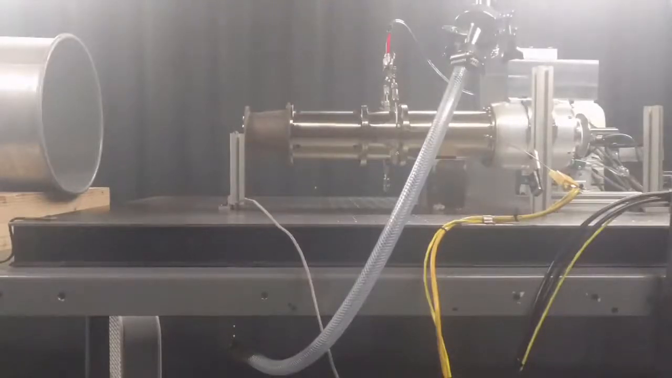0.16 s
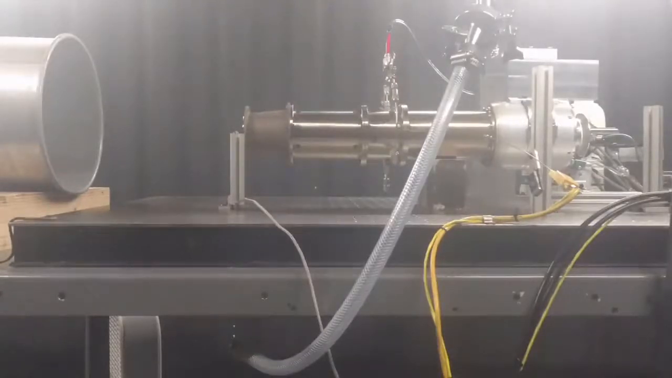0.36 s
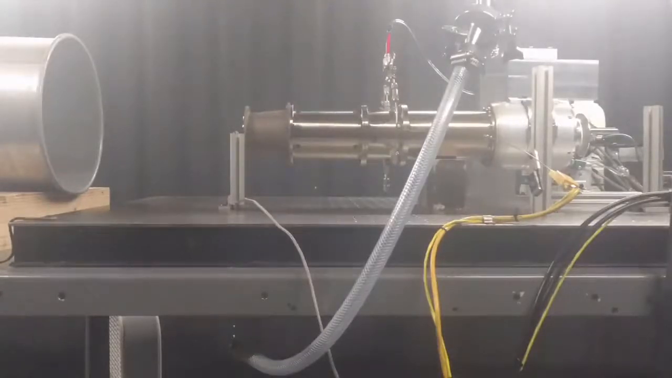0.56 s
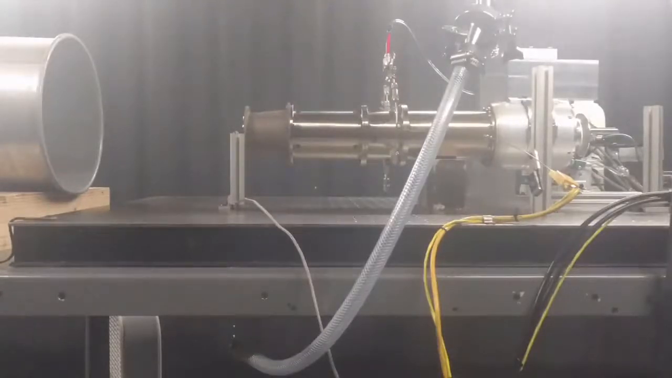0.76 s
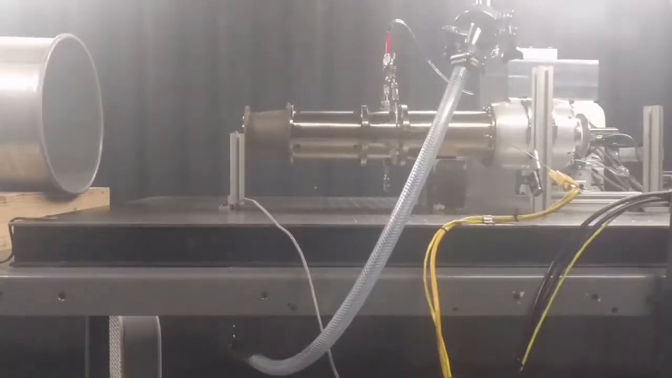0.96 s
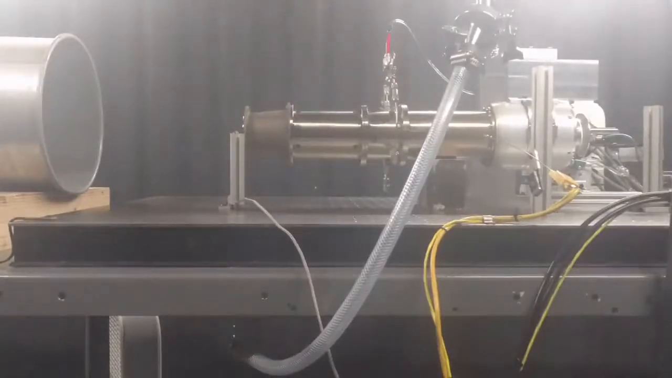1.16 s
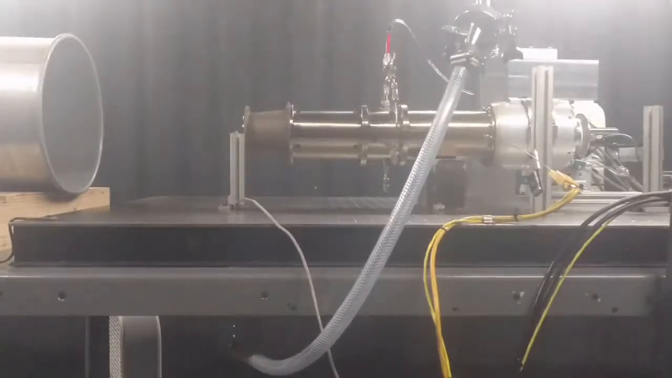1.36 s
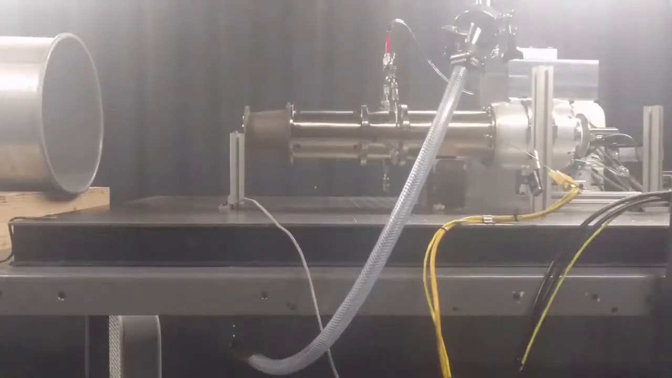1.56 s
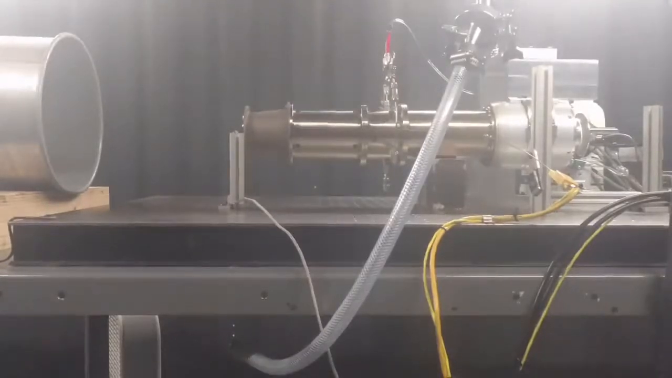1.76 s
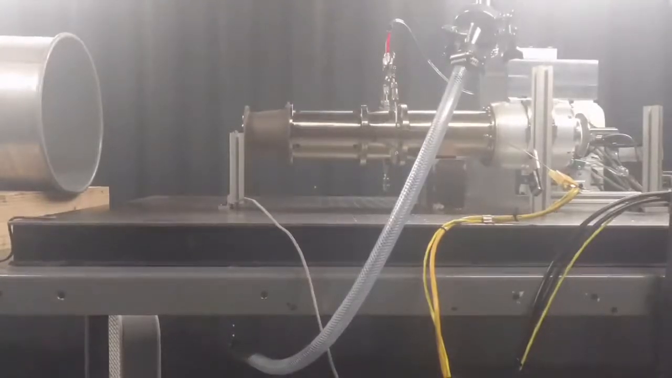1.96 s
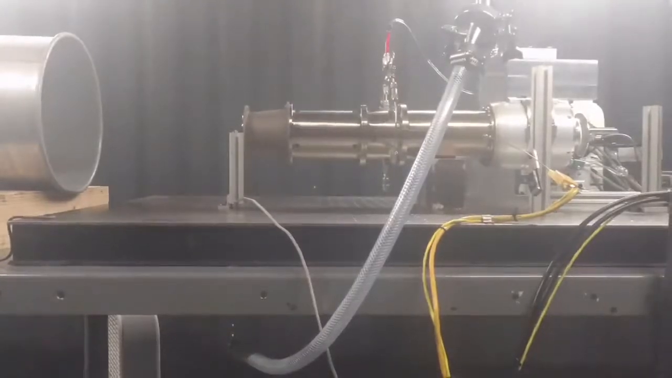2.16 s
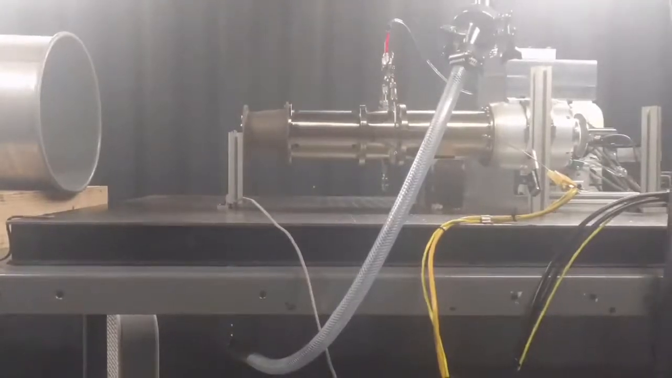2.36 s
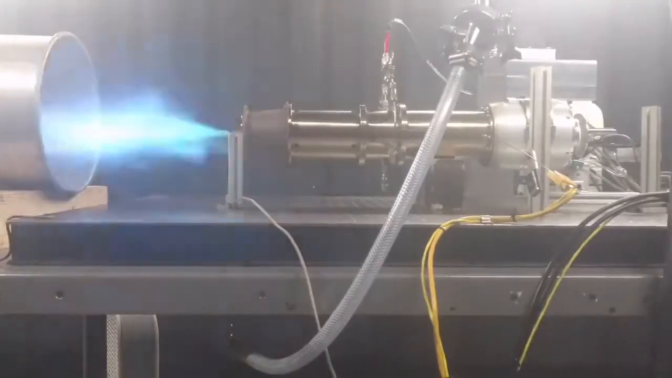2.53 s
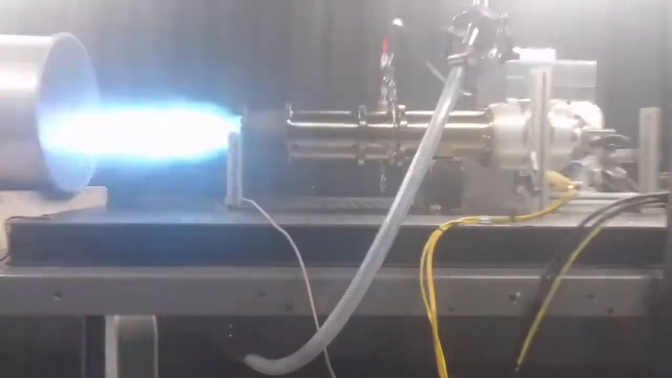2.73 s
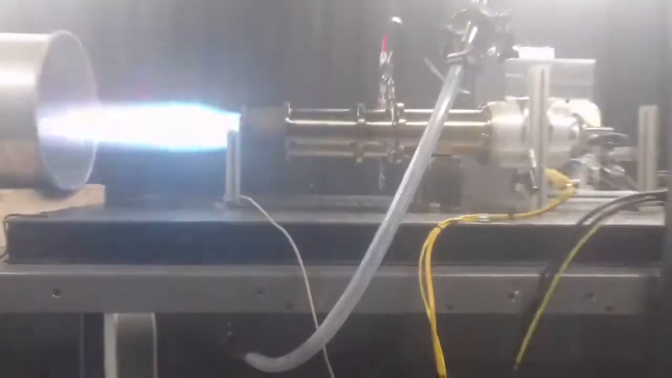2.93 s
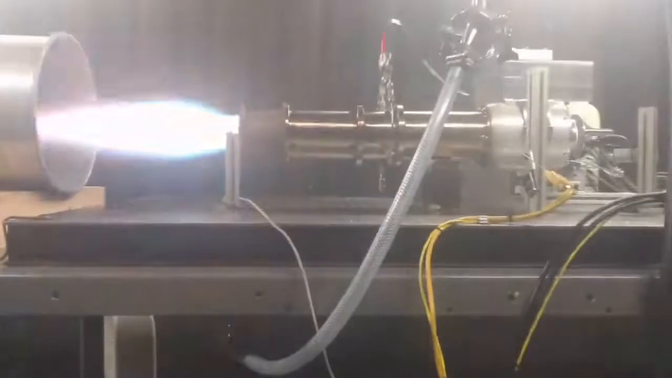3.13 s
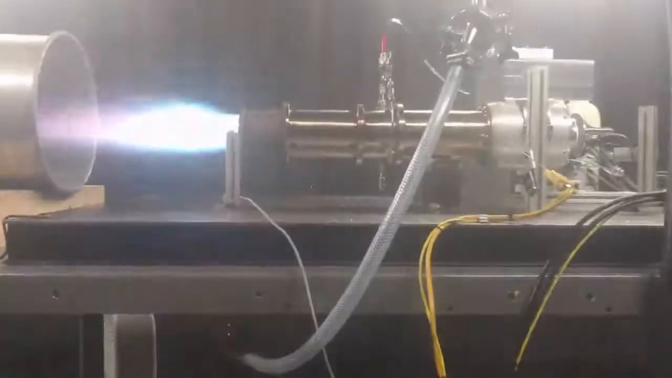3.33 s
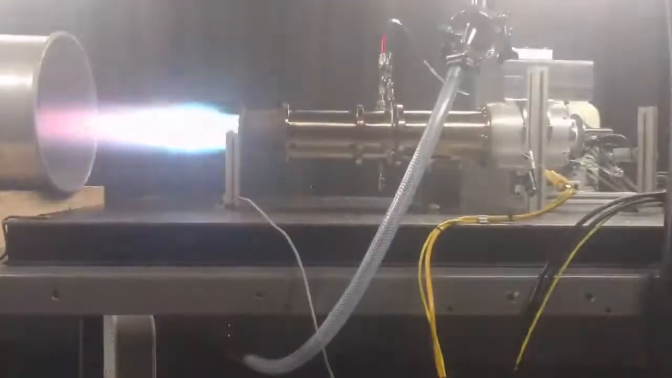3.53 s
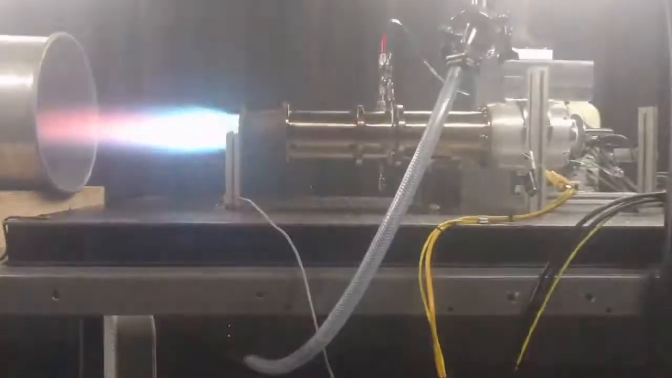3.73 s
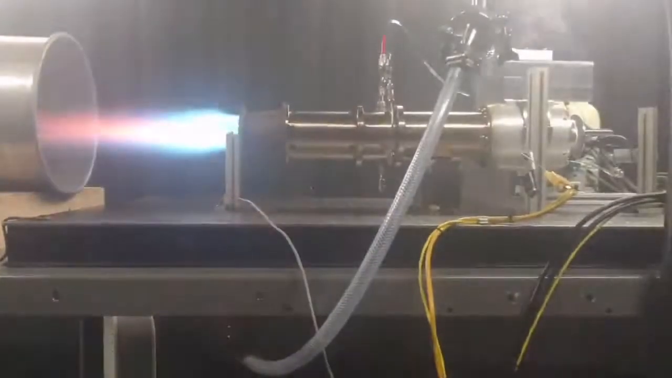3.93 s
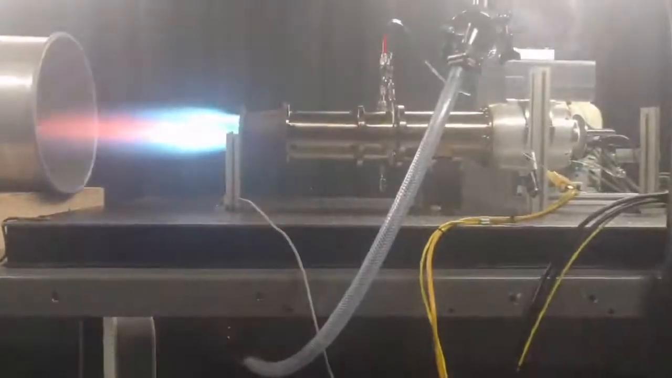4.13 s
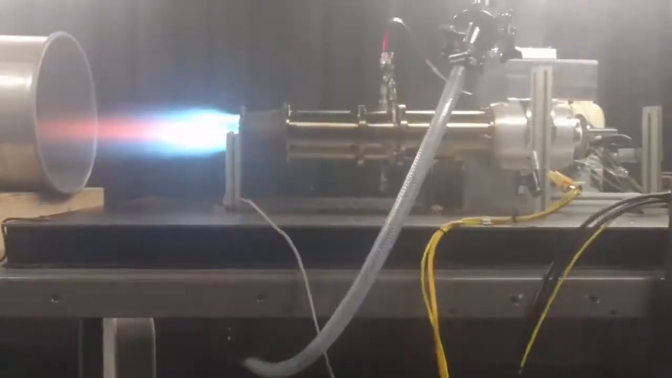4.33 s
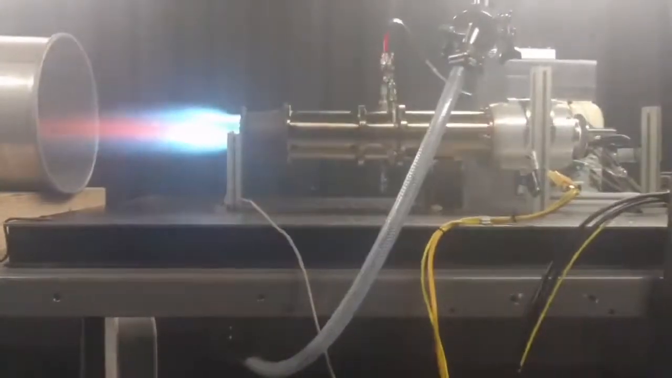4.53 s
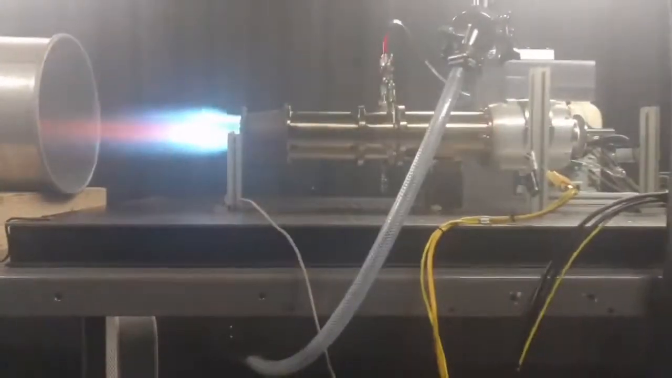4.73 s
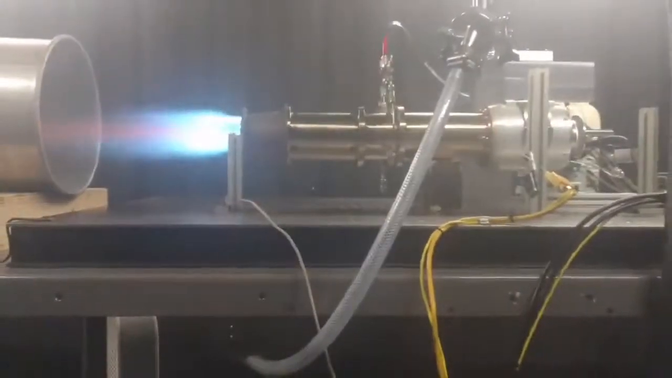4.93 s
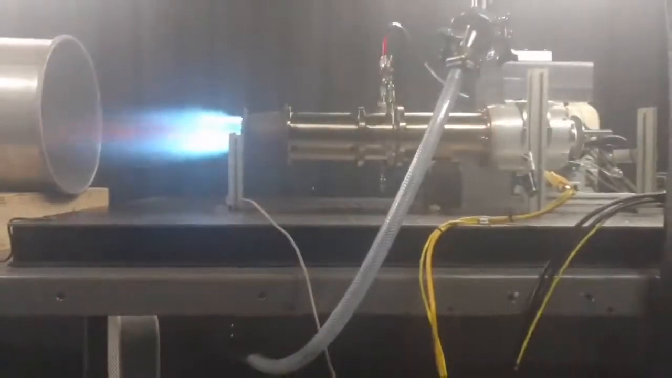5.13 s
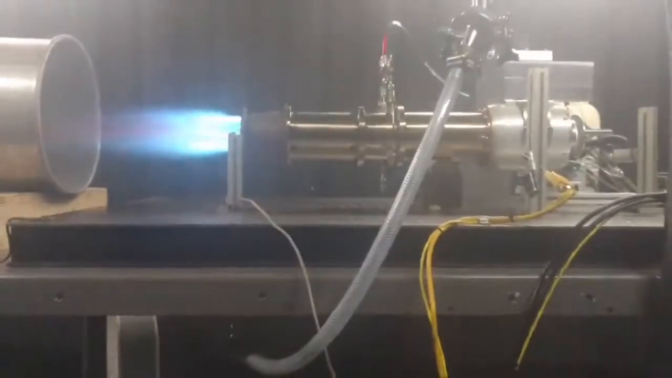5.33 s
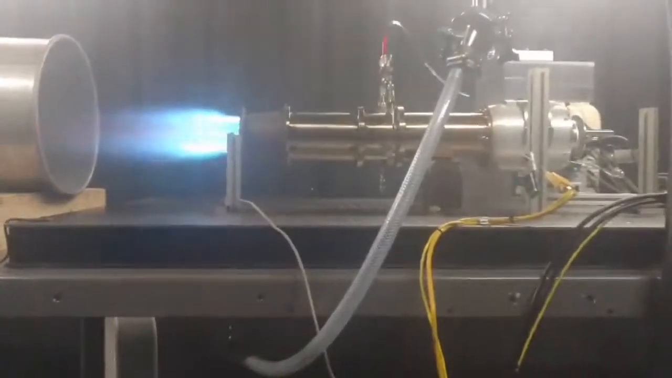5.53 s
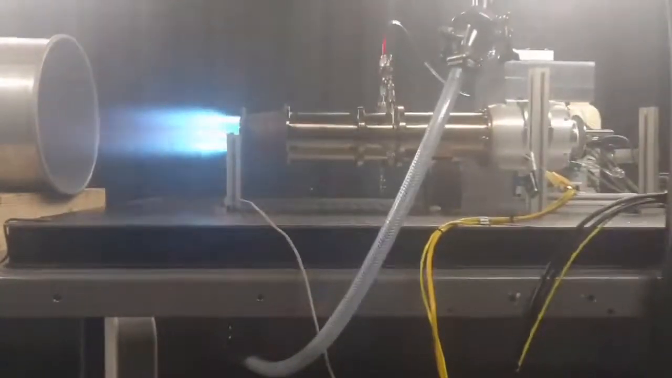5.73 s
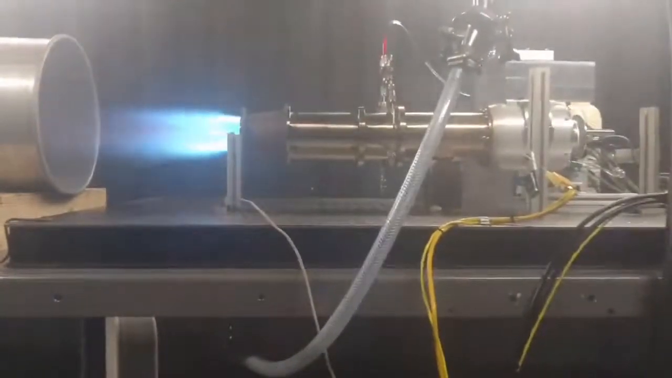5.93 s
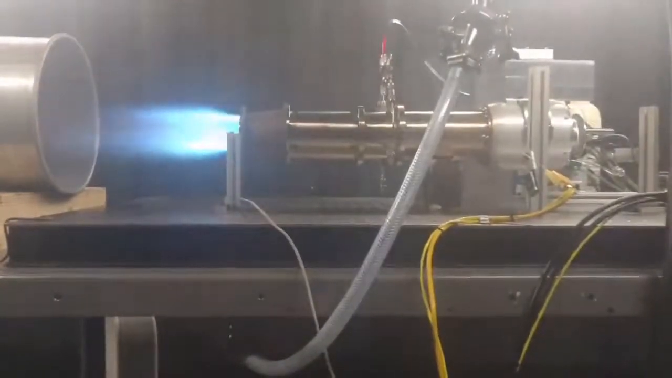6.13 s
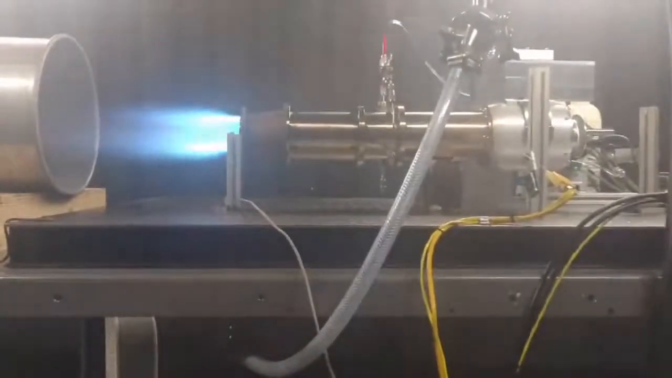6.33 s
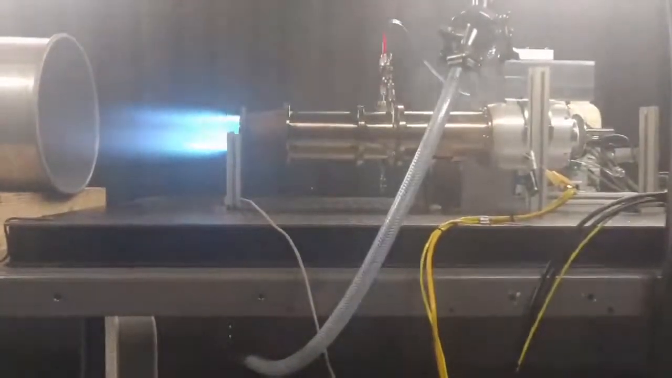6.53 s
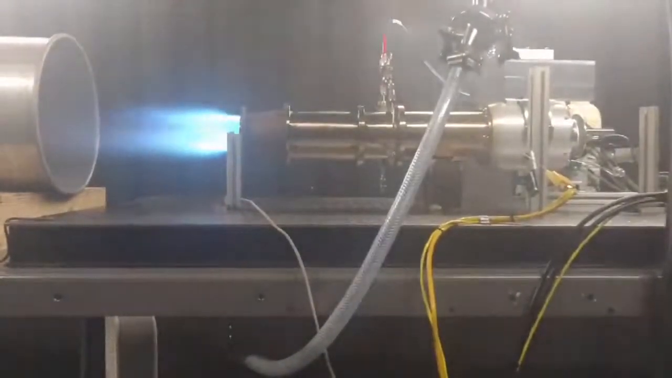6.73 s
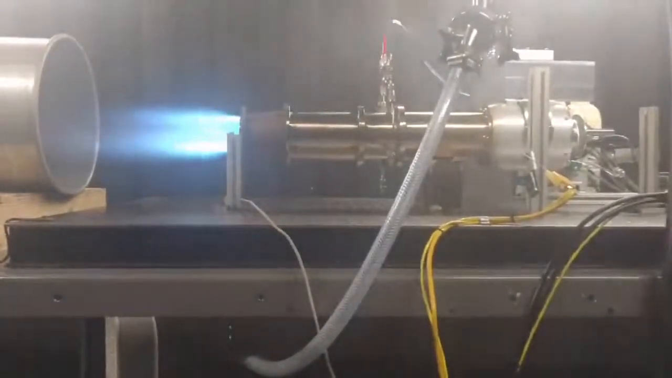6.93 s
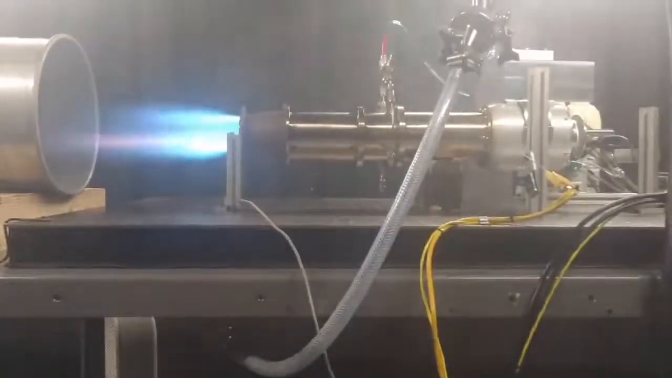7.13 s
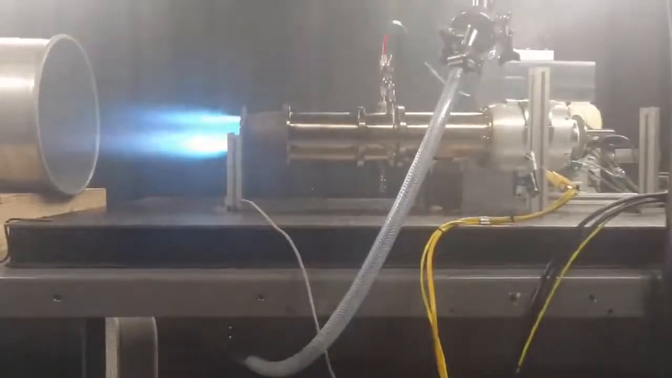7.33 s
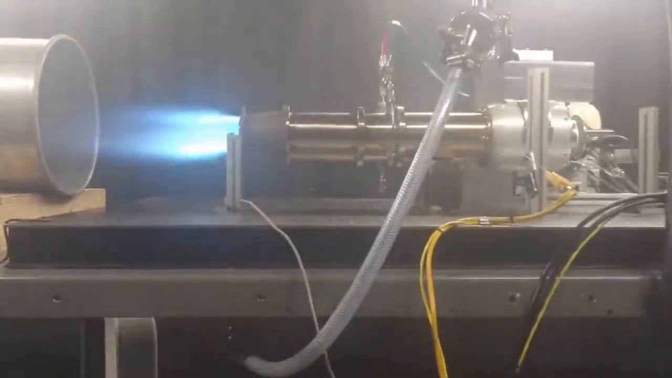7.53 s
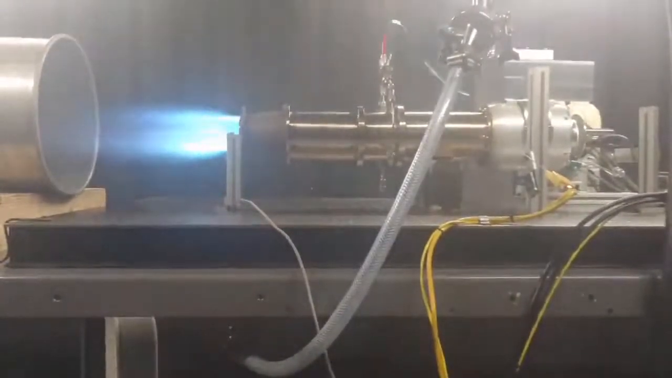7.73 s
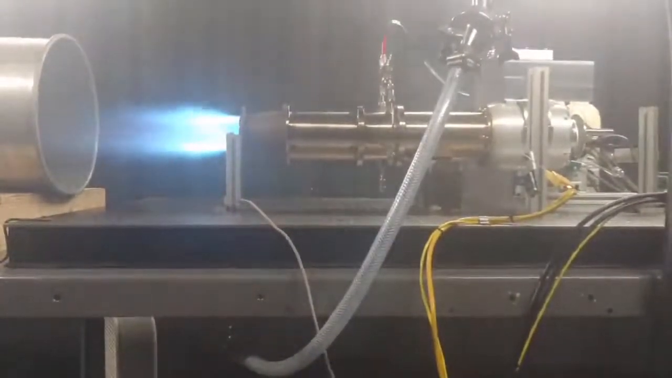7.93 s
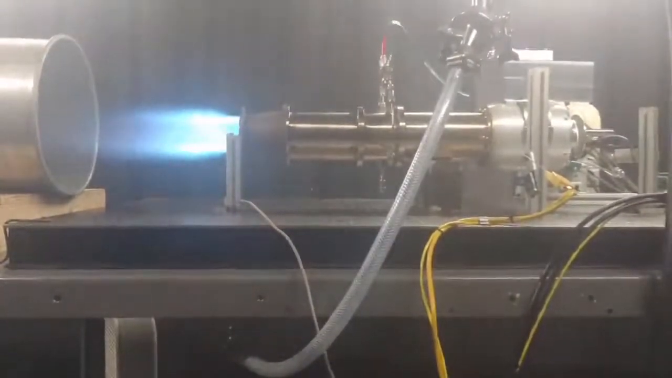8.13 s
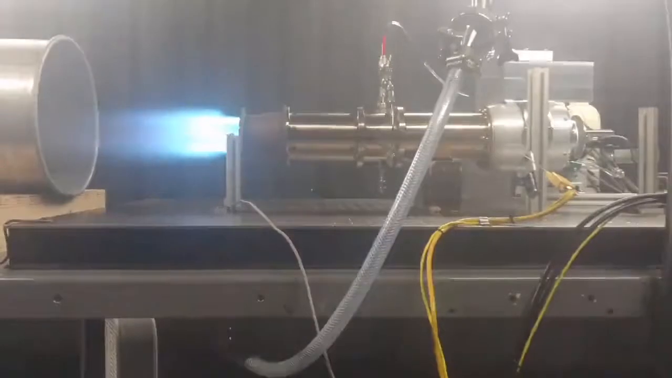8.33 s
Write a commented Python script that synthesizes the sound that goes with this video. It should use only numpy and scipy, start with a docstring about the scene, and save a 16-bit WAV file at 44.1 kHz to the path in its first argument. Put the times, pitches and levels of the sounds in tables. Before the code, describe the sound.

Close to a small turbine in a hard-walled test cell: piercing blade whine, breathy exhaust hiss and a restrained low rumble. After a couple of seconds comes a thick ignition whump, and a hollow tail-pipe roar swells up as the engine spools higher. Thin whistles sit on top, and the roar flutters with small quick dips. The loud part sounds compressed and rough, with no ending.

```python
"""A small jet engine idles on a test rig with a thin blade whine and a whistle over the hiss of its jet.
The shaft starts to spool up, the afterburner lights with a deep boom and rumble, and the blade tones climb.
Then filtered noise roars in the tail pipe, two more whistles sound, and the flame sputters now and then.
Two close microphone ports hear it, one late and inverted; the loudest peaks overload."""
import sys
import numpy as np
from scipy import signal
from scipy.fft import rfft, irfft
from scipy.io import wavfile
from scipy.ndimage import uniform_filter1d

SR = 44100
rng = np.random.default_rng(int(sys.argv[2]) if len(sys.argv) > 2 else 0)


def log_audio(samples):
    """Write samples as a 16-bit WAV file to the path given in sys.argv[1]."""
    # one column per channel
    frames = np.atleast_2d(samples).T
    # limit to full scale, then quantise
    limited = np.clip(frames, -1, 1)
    pcm = np.round(limited * 32767).astype(np.int16)
    wavfile.write(sys.argv[1], SR, pcm)


N = 373968
HZ = np.maximum(np.fft.rfftfreq(N, 1 / SR), 1)   # bin frequencies, floored at 1 Hz for the logarithm

# change from unlit to lit: (time [s], share of the lit sound against the unlit sound [0-1])
LIT_SHARE = [(2.64, 0.027), (2.72, 0.58), (3.2, 0.94)]


def from_db(db):
    """Level to amplitude: 20 dB is a factor of ten."""
    return 10 ** (np.asarray(db) / 20)


def rms_one(x):
    """Normalize the mean power to 1."""
    return x / np.sqrt(np.mean(x ** 2) + 1e-20)


def in_time(rows):
    """Linear interpolation: each column of a time table, one value per sample."""
    s, *columns = np.transpose(rows)
    return [np.interp(np.arange(N) / SR, s, c) for c in columns]


def at_hz(points, beyond=None):
    """Interpolation over log frequency: a table read at every bin."""
    hz, value = np.transpose(points)
    return np.interp(np.log(HZ), np.log(hz), value, beyond, beyond)


def drift(corner_hz):
    """Low-passed random process: white noise through two equal poles, scaled to rms 1."""
    step, run_in = 40, 2000   # drawn at every 40th sample, after the filter has settled
    pole = np.exp(-2 * np.pi * corner_hz * step / SR)
    white = rng.standard_normal(N // step + 2 + run_in)
    slow = signal.lfilter([1], [1, -2 * pole, pole * pole], white)[run_in:]
    return np.interp(np.arange(N) / step, np.arange(len(slow)), rms_one(slow))


def blend(before, after, share):
    """Equal-power crossfade: unrelated noises add in power."""
    share = np.clip(share, 0, 1)
    return np.sqrt(1 - share) * before + np.sqrt(share) * after


def duct():
    """Resonance: each mode lifts (or lowers) the level along a bell over frequency."""
    # modes of tail pipe, exhaust duct and test cell: (frequency [Hz], width [Hz], boost [dB])
    modes = [(147, 6.6, -2), (205, 20, 4), (275, 30, 4), (370, 24, 5), (487, 25, 3.5), (575, 50, 4),
             (851, 90, 4), (1250, 60, 3), (1540, 20, 4), (1945, 30, 3.5)]
    return from_db(sum(db / (1 + (2 * (HZ - hz) / width_hz) ** 2) for hz, width_hz, db in modes))


def turbulence(colour, patchy_db, rate):
    """Broadband flow noise: two unrelated coloured draws under one random envelope; joint rms 1."""
    white = rfft(rng.standard_normal((2, N)))
    coloured = irfft(white * from_db(at_hz(colour, -200)) * duct(), N)
    return rms_one(coloured * from_db(patchy_db * drift(rate)))


def whistle(rows, line_share, width_hz):
    """Flow tone of imperfect coherence: a wavering line in a narrow noise band, inaudible outside its rows."""
    hz, db = in_time([(rows[0][0] - .01, rows[0][1], -120)] + rows)
    db = np.where(np.arange(N) / SR > rows[-1][0], -120, db)
    phase = 2 * np.pi * np.cumsum(hz + 12 * drift(7.92)) / SR
    band = drift(width_hz) * np.cos(phase) + drift(width_hz) * np.sin(phase)
    line = np.sqrt(2) * from_db(5 * drift(12)) * np.sin(phase)
    return from_db(db) * blend(band, line, line_share)


def blade_whine(base_hz):
    """Harmonic series on the blade rate: eddies make the lines flutter and spread noise as the shaft speeds up."""
    # blade tones: (time [s], 2nd harmonic [dB], 3rd harmonic [dB]), before flutter
    middle_harmonics = [(0.0, -26.5, -40), (0.2, -24, -32), (0.27, -34, -34), (0.4, -22.5, -29),
                        (0.6, -26.5, -39), (0.8, -31, -20.5), (1.03, -29.5, -28), (1.2, -26, -43),
                        (1.4, -22, -28), (1.76, -18, -29), (1.85, -30, -36), (2.13, -29, -29),
                        (2.2, -30, -31), (2.3, -29, -26), (2.52, -21.5, -28), (2.75, -39, -27),
                        (3.1, -30, -26), (3.45, -22, -29), (3.65, -26, -47), (3.85, -30, -48),
                        (4.2, -30.5, -46), (4.45, -34, -39), (4.8, -39, -36), (5.1, -34, -35),
                        (5.4, -38, -40), (5.65, -31, -31), (6.4, -34, -32), (6.55, -35, -46),
                        (7.15, -36, -46), (7.4, -36, -36), (8.48, -36, -35)]
    first_db, fourth_db = -44, -49
    wander_db, wander_hz = 1.2, 3.5
    phase = 2 * np.pi * np.cumsum(base_hz * (1 + .0008 * drift(25))) / SR
    speeding = np.clip(np.gradient(base_hz) * SR / 900, .05, 1)   # 1 at a rise of 900 Hz/s
    levels_db = [first_db] + in_time(middle_harmonics) + [fourth_db]
    out = 0
    for k, db in enumerate(levels_db, 1):
        flutter = from_db(np.minimum(5 * drift(14), 3))
        line = np.sqrt(2) * (1 - .6 * speeding) * flutter * np.sin(k * phase)
        skirt = drift(95) * np.sin(k * phase) + drift(140) * np.cos(k * phase)
        skirt = from_db(1.5) * np.maximum(speeding, .2) * skirt
        out = out + from_db(db + wander_db * drift(wander_hz)) * (line + skirt)
    return out


def jet_hiss(level_db, base_hz):
    """Jet mixing noise: its colour follows the shaft rate, and its treble flickers."""
    # colour at low shaft rate: (frequency [Hz], relative density [dB per Hz])
    idle_colour = [(2600, -30), (3000, -9), (3400, -4), (4200, -8), (5200, -9), (5900, -1), (6400, -5),
                   (7300, -6), (8500, 0), (9100, -1), (9800, -9), (10600, -14), (12000, -21), (12600, -27),
                   (13700, -29), (14400, -35), (15400, -38)]
    # colour at high shaft rate: (frequency [Hz], relative density [dB per Hz])
    full_colour = [(2500, -24), (2850, -1), (3500, 0), (4200, -2), (6100, 0), (6900, -3), (8000, -4),
                   (8400, -2), (9050, -5), (9450, -1), (10500, -6), (12100, -10), (14000, -11),
                   (14600, -24)]
    spooled = (base_hz - 3226) / 1020   # blend holds it within 0-1
    idle = turbulence(idle_colour, patchy_db=.6, rate=14)
    full = turbulence(full_colour, patchy_db=.6, rate=14)
    hiss = blend(idle, full, spooled)
    treble = irfft(rfft(hiss) * (HZ > 10500), N)
    hiss = hiss + (from_db(1.8 * drift(12)) - 1) * treble
    return from_db(level_db) * hiss


def tail_pipe_roar(level_db, lit):
    """Pipe resonance in broadband noise: the roar changes colour with the flame and a surging howl joins it."""
    # colour before the flame: (frequency [Hz], relative density [dB per Hz])
    idle_colour = [(350, -25), (480, -3), (700, -1), (1000, -3), (1300, -7), (1600, -4), (1850, -3),
                   (2100, 2), (2500, 0), (2800, -3.5), (3100, -30)]
    # colour with the flame: (frequency [Hz], relative density [dB per Hz])
    full_colour = [(350, -20), (480, -2), (650, -3), (850, -2), (1050, -6), (1350, -10), (1800, -9),
                   (2300, -6), (2550, -10), (2800, -16), (3200, -35)]
    # main resonance of the tail pipe: (frequency [Hz], relative density [dB per Hz])
    howl_colour = [(600, -30), (730, -6), (870, 0), (970, -5), (1120, -30)]
    idle = turbulence(idle_colour, patchy_db=.4, rate=9)
    full = turbulence(full_colour, patchy_db=.9, rate=9)
    howl = lit * from_db(-11) * turbulence(howl_colour, patchy_db=3, rate=12.0)
    return from_db(level_db) * (blend(idle, full, lit) + howl)


def rumble_and_wind(level_db, lit):
    """Low broadband noise: the rumble changes colour with the flame; sub-bass buffets of wind on the ports join it."""
    # colour before the flame: (frequency [Hz], relative density [dB per Hz])
    idle_colour = [(15, -42), (45, -35), (80, -7), (100, -15), (130, -5), (200, 0), (280, 1.5), (350, -5),
                   (450, -13.5), (600, -41)]
    # colour with the flame: (frequency [Hz], relative density [dB per Hz])
    lit_colour = [(45, -28), (80, -14), (130, -5), (170, -2), (230, 0), (350, -2), (450, -7), (600, -30)]
    # colour of the wind buffets: (frequency [Hz], relative density [dB per Hz])
    buffet_colour = [(15, -18), (30, -23), (45, -20), (62, 3), (85, 10), (120, -19)]
    surge_db, surge_hz = .9, 4
    idle = turbulence(idle_colour, patchy_db=2.5, rate=17.0)
    burning = turbulence(lit_colour, patchy_db=-1.2, rate=15)
    buffets = from_db(-27.0 + 2.1 * lit) * turbulence(buffet_colour, patchy_db=3.5, rate=7.7)
    return from_db(level_db + surge_db * drift(surge_hz)) * (blend(idle, burning, lit) + buffets)


def ignition_boom():
    """Sudden heat release: unburnt fuel goes up in low noise with an attack, slow swell and steady fall."""
    # colour: (frequency [Hz], relative density [dB per Hz])
    boom_colour = [(50, -30), (90, -15), (135, 4), (200, 0), (260, -12), (400, -15), (650, -16),
                   (1000, -40)]
    start_s, attack_s, hold_s = 2.657, .012, .34
    peak_db, swell_db, fall_db_per_s = -13, 1, 120
    held_s = start_s + attack_s
    fall_s = held_s + hold_s
    level_db = in_time([(0, -120), (start_s, -120), (held_s, peak_db - swell_db), (fall_s, peak_db),
                        (fall_s + 1, peak_db - fall_db_per_s)])[0]
    return from_db(level_db) * turbulence(boom_colour, patchy_db=2.0, rate=10.0)


def sputter_db():
    """Flame instability: each sputter is a smooth squared-cosine dip of the level and back."""
    # momentary sinking of the flame: (time at the deepest [s], length [s], dip of the roar [dB])
    sputters = [(4.873, 0.028, -5.5), (4.96, 0.065, -3), (5.383, 0.069, -6), (5.569, 0.12, -5),
                (5.62, .05, -5.5), (5.79, 0.12, -5), (6.07, 0.2, -2.5), (6.337, 0.098, -3),
                (6.442, 0.36, -4), (6.675, 0.046, -3), (6.79, 0.18, -2), (6.934, 0.16, -2.5),
                (7.237, 0.1, -1.5), (7.549, 0.068, -0.5), (7.62, 0.042, -3), (8.018, 0.084, -3),
                (8.176, 0.084, -2.5)]
    t = np.arange(N) / SR
    return sum(db * np.cos(np.pi * np.clip((t - s) / length, -.5, .5)) ** 2 for s, length, db in sputters)


def flame_and_jet(base_hz):
    """Superposition of hiss, roar, rumble with wind, and boom; the sputters dip all but the boom."""
    # levels before the sputters: (time [s], flame rumble [dB], tail pipe roar [dB], jet hiss [dB])
    burn = [(0.0, -27, -25.5, -20), (0.8, -22.5, -25, -20), (1.5, -25.5, -24.5, -20),
            (2.0, -23.5, -25, -19.5), (2.4, -19, -23, -18.5), (2.645, -20.5, -21.5, -18),
            (2.675, -11, -20, -18.5), (2.78, -9, -17.5, -18.5), (2.9, -7, -15.5, -19),
            (3.05, -8.5, -13.5, -18.5), (3.3, -11, -12, -17), (4.05, -8, -11, -16), (4.35, -12, -11.5, -17),
            (5.2, -11, -12.5, -17), (6.25, -11, -12.5, -17), (6.6, -12, -12.5, -18), (7.2, -10, -13, -17),
            (7.8, -12, -13.5, -17.5), (8.48, -11, -13, -17)]
    dip_per_roar_dip = [1.6, 1, .45]   # rumble, roar, hiss [dB per dB]
    rumble_db, roar_db, hiss_db = in_time(burn) + np.outer(dip_per_roar_dip, sputter_db())
    lit = in_time(LIT_SHARE)[0]
    background = jet_hiss(hiss_db, base_hz) + tail_pipe_roar(roar_db, lit)
    return background + rumble_and_wind(rumble_db, lit) + ignition_boom()


def ports(flow, tones, tones_right_db):
    """Partial coherence: the right port hears the left's sound late and inverted, mixed with its own."""
    # phase shift by the housing: (frequency [Hz], lead of the right port [rad])
    right_lead = [(100, 0), (600, -.25), (1250, -.08), (2000, -.2), (2500, -.15), (2700, -.65),
                  (3100, -.45), (3800, 0), (8000, .2), (10000, .7), (12500, .9), (15300, .5)]
    # likeness of the ports where they are in or out of phase: (frequency [Hz], likeness [0-1])
    in_or_out_of_phase = [(30, .995), (55, .99), (90, .95), (140, .8), (250, .72), (450, .65), (900, .999),
                          (4000, .997), (5100, .6), (6400, .78), (7700, .38), (9500, .4), (10400, .6),
                          (12000, .85), (14200, .95)]
    # likeness midway between those phases: (frequency [Hz], likeness [0-1])
    between_phases = [(200, .6), (640, .45), (1900, .35), (3100, .05), (4500, .2), (6000, .25), (8500, .3),
                      (11000, .2), (14500, .1)]
    # flow noise of the right port against the left: (frequency [Hz], gain [dB])
    right_gain = [(30, 0), (120, -1), (250, -2.8), (600, -2.5), (900, 0), (3900, 0), (4500, -1.5),
                  (6500, -1.5), (8500, -5), (9800, -4), (10600, -1.5), (12500, 0)]
    lag_s = .000392
    shared, own = rfft(flow)
    lag = 2 * np.pi * HZ * lag_s - at_hz(right_lead)   # radians
    locked = at_hz(in_or_out_of_phase)
    alike = locked - (locked - at_hz(between_phases)) * np.abs(np.sin(lag)) ** 3
    dwell = np.exp(1j * locked * np.sin(2 * lag) / 2)   # the phase lingers near in and out of phase
    right = alike * dwell * shared + np.sqrt(1 - alike ** 2) * own
    right = right * from_db(at_hz(right_gain))
    right = right + from_db(tones_right_db) * rfft(tones)
    return np.array([flow[0] + tones, irfft(-right * np.exp(-1j * lag), N)])


def scene():
    """Superposition at the two ports: blade tones and hiss colour follow one shaft rate."""
    # the shaft spools up: (time [s], base rate of the blade tones [Hz])
    speed = [(0.0, 3409), (0.9, 3391), (2.0, 3381), (2.25, 3408), (2.55, 3515), (2.9, 3745), (3.3, 4070),
             (3.8, 4553), (4.05, 4750), (4.35, 4888), (4.7, 4992), (5.1, 5070), (5.6, 5105), (6.2, 5116),
             (7.0, 5096), (7.4, 5040), (7.85, 4955), (8.48, 5007)]
    # whistles in the flow, one at idle, two after the flame lights; each: (time [s], frequency [Hz], level [dB])
    whistles = [
        [(0.0, 8810, -36), (0.6, 8820, -35), (1.1, 8850, -33), (1.7, 8850, -36), (2.4, 8900, -40),
         (2.7, 9000, -50)],
        [(3.4, 8300, -48), (3.65, 8350, -27), (3.95, 8240, -28), (4.3, 8290, -27), (4.75, 8350, -28),
         (5.0, 8330, -38)],
        [(4.9, 9370, -50), (5.0, 9370, -29), (5.2, 9370, -26), (5.45, 9360, -32), (6.7, 9360, -32),
         (7.5, 9320, -32), (8.48, 9400, -29)],
    ]
    base_hz = uniform_filter1d(in_time(speed)[0], size=SR // 5)   # the heavy shaft rounds every change
    tones = sum(whistle(rows, line_share=.3, width_hz=70) for rows in whistles)
    tones = tones + blade_whine(base_hz)
    return ports(flame_and_jet(base_hz), tones, tones_right_db=-5.0)


def hollow(x, bands):
    """Time-varying band-stop: short-time spectra are emptied between two wandering edges."""
    hz, s, cells = signal.stft(x, SR, nperseg=1024, noverlap=768)
    at = np.minimum(s * SR, N - 1).astype(int)
    lit = in_time(LIT_SHARE)[0][at]
    for centre_hz, idle_hz, lit_hz, wander_hz in bands:
        reach_hz = idle_hz + lit * (lit_hz - idle_hz)
        below = reach_hz + wander_hz * drift(13)[at]
        above = reach_hz + wander_hz * drift(13)[at]
        cells[(hz[:, None] > centre_hz - below) & (hz[:, None] < centre_hz + above)] = 0
    return signal.istft(cells, SR, nperseg=1024, noverlap=768)[1][:N]


def flicker(pair):
    """Sum and difference signals: the stereo image flickers as hollow bands open and close in each."""
    # bands of the sum: (centre [Hz], mean reach each way unlit [Hz], lit [Hz], rms wander [Hz])
    shared_bands = [(10, 90, 60, 80), (2470, 290, 190, 130), (5200, -40, 110, 160), (7750, -70, -30, 120),
                    (10700, 20, -120, 200), (13000, 350, 120, 250)]
    # bands of the difference: (centre [Hz], mean reach each way unlit [Hz], lit [Hz], rms wander [Hz])
    apart_bands = [(1200, 260, 200, 100), (3850, 300, 260, 150), (6500, -100, 110, 200)]
    shared = hollow((pair[0] + pair[1]) / 2, shared_bands)
    apart = hollow((pair[0] - pair[1]) / 2, apart_bands)
    return np.array([shared + apart, shared - apart])


def record(dry):
    """Saturation and band limiting: peaks round and clip, the stereo image flickers, the top is cut."""
    overloaded = np.clip(4 * np.tanh(dry / 4), -.9, .9)
    top_cut = signal.ellip(14, .3, 60, 15480, fs=SR, output="sos")
    return signal.sosfilt(top_cut, flicker(overloaded))


dry = scene()
out = record(dry)
log_audio(out)
```